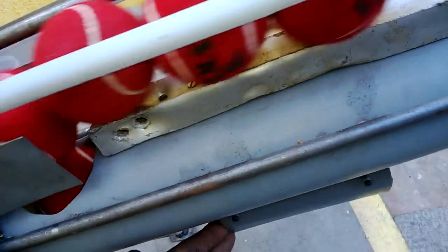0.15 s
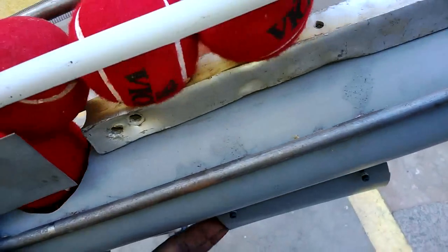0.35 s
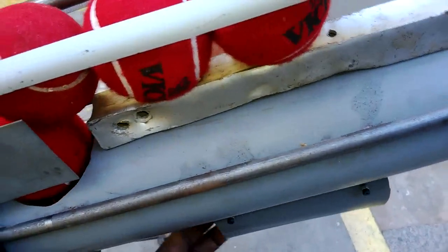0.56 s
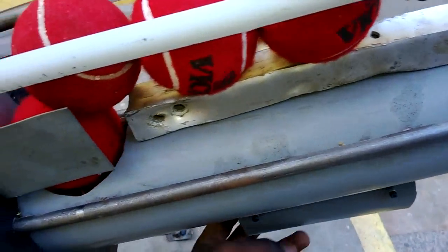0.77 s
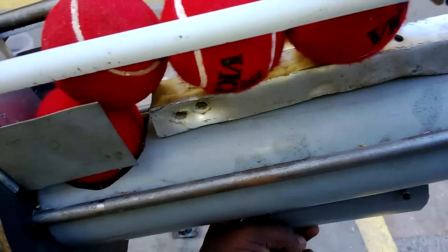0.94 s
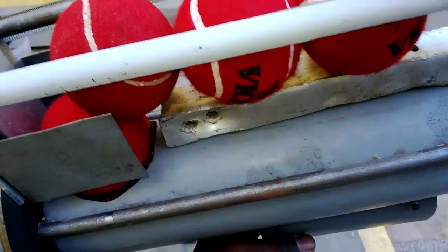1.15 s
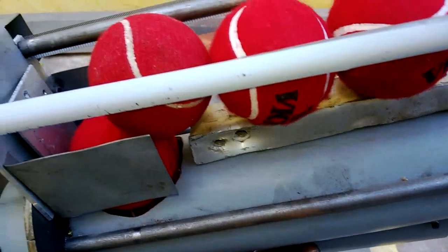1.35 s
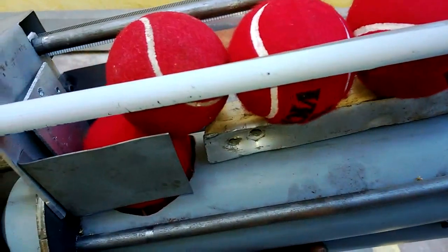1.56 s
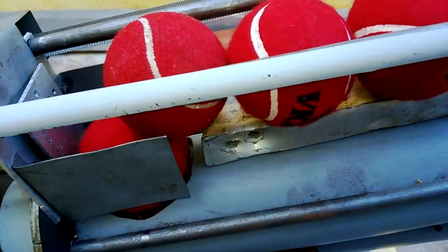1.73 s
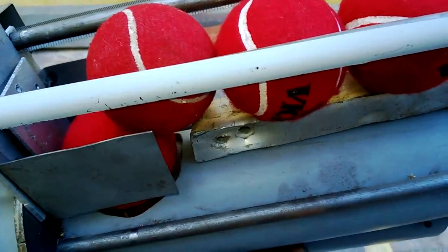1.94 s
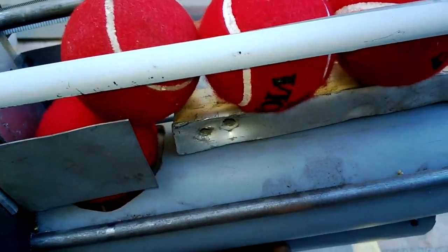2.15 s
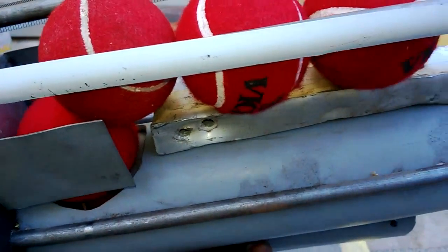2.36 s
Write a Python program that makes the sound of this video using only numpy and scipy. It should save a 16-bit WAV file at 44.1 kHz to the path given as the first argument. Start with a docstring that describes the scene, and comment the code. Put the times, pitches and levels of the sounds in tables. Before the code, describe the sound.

Outdoors, close to the microphone, a ball launcher's plunger slams into a pipe and loose steel parts clatter briefly. A ball then knocks softly on a tray, over faint rumble, far machinery and a thin high whine.

```python
"""Outdoors, close to a homemade ball launcher. The catch slips and the plunger slams into the pipe,
exciting its normal modes under a noisy crack. Loose steel parts scrape by friction and rattle by
repeated impact, the frame shudders, and a ball settles on a tray with faint knocks. Distant machinery
drones over a low rumble and a faint hiss; a thin electronic whine sits at the top."""
import sys
import numpy as np
from scipy import signal
from scipy.fft import rfft, irfft, next_fast_len
from scipy.io import wavfile
from scipy.ndimage import uniform_filter1d, map_coordinates

SR = 44100
rng = np.random.default_rng(int(sys.argv[2]) if len(sys.argv) > 2 else 0)


def generate_wav(sig):
    """Save sig (samples, or channels by samples) to the path in sys.argv[1] as 16-bit PCM at SR."""
    pcm = np.round(np.clip(np.atleast_2d(sig).T, -1, 1) * 32767).astype(np.int16)
    wavfile.write(sys.argv[1], SR, pcm)


N = 105840
T = np.arange(N) / SR


def amp(db):
    """Amplitude ratio of a level in decibels."""
    return 10 ** (np.asarray(db) / 20)


def unit(x):
    """Normalisation to an rms of 1."""
    return x / np.sqrt(np.mean(x ** 2) + 1e-20)


def envelope(times, db):
    """Gain interpolated in decibels, zero outside the given times."""
    return amp(np.interp(T, times, db)) * (T >= times[0]) * (T <= times[-1])


def wobble(rate):
    """Smooth random modulation with rate knots a second."""
    return map_coordinates(rng.standard_normal(int(N * rate / SR) + 4), [T * rate])


def filtered(x, response):
    """Linear filtering: the spectrum of x times a frequency response."""
    size = next_fast_len(len(x) + 8192)
    return irfft(rfft(x, size) * response(np.fft.rfftfreq(size, 1 / SR)), size)[:len(x)]


def shelf(x, treble_db, corner_hz=12000):
    """Shelving filter: what a two-pole low-pass rejects is scaled by treble_db."""
    low = filtered(x, lambda f: 1 / (1 + 1j * f / corner_hz) ** 2)
    return low + amp(treble_db) * (x - low)


def noise(spectrum, size=N, patchy_db=0):
    """Coloured noise of rms 1, modulated in random patches of time and frequency."""
    cells = signal.stft(rng.standard_normal(size + 512), nperseg=512)[2]
    patches = uniform_filter1d(rng.standard_normal(cells.shape), 4, axis=0)
    patches = unit(uniform_filter1d(patches, 12, axis=1))
    white = signal.istft(cells * amp(patchy_db * patches), nperseg=512)[1][:size]
    hz, db = np.transpose(spectrum)
    return unit(filtered(white, lambda f: amp(np.interp(np.log(f + 1), np.log(hz + 1), db, -120, -120))))


def decay(t, t60, hold_s=0):
    """Exponential damping: steady for hold_s, then down 60 dB every t60 seconds."""
    return amp(-60 * np.maximum(t - hold_s, 0) / t60)


def ring(modes, t, scatter_db, hold_s=0):
    """Modal superposition: damped sinusoids, each with a random spread in level."""
    return sum(amp(db + rng.normal(0, scatter_db)) * decay(t, t60, hold_s) * np.sin(2 * np.pi * hz * t)
               for hz, db, t60 in modes)


def add(x, start_s, piece):
    """Superposition of a piece on x from start_s."""
    x[round(start_s * SR):][:len(piece)] += piece


# Rumble spectrum: f/Hz, spectral level/dB
RUMBLE_SPECTRUM = [(12, -50), (20, -20), (37, -10.5), (55, -1), (68, -6.5), (78, -3), (92, 2), (108, -12),
                   (125, -11.5), (160, -42)]
# Rumble envelope: t/s, level/dB
RUMBLE_ENVELOPE = [(0.0, -60), (0.01, -47.5), (0.34, -33.5), (0.53, -43), (0.56, -36), (0.62, -44.5),
                   (0.75, -35), (0.79, -42), (1.65, -42), (1.71, -34.5), (1.86, -57.5), (1.88, -41),
                   (2.03, -36.5), (2.12, -49), (2.17, -43), (2.4, -43.5)]
def rumble():
    """Amplitude modulation of low-frequency noise gives a lumpy rumble."""
    return envelope(*np.transpose(RUMBLE_ENVELOPE)) * noise(RUMBLE_SPECTRUM)


# Drone spectrum: f/Hz, spectral level/dB
DRONE_SPECTRUM = [(71, -30.5), (120, -0.5), (206, -4), (242, -3.5), (259, -14.5), (334, -5.5), (387, -5.5),
                  (507, 0), (550, -8.5), (596, -1), (710, -13.5), (1050, -20), (1220, -11), (1570, -6),
                  (1700, -13.5), (2060, -10), (3000, -34), (3900, -62.5), (6600, -120)]
# Drone envelope: t/s, level/dB
DRONE_ENVELOPE = [(0, -44.5), (.8, -42), (1.1, -43.5), (1.21, -42), (1.36, -45.5), (1.52, -42.5),
                  (1.6, -43.5), (1.7, -41.5), (1.8, -42), (1.86, -45), (1.93, -43.5), (2.03, -42),
                  (2.18, -44.5), (2.4, -43)]
# Machine hums: f/Hz, mean level/dB
HUM_BANDS = [(522.2, -58.5), (586.8, -64), (1260, -58), (1534, -55.5), (2003, -56.5), (2169, -61)]
# Far hiss: f/Hz, spectral level/dB
HISS_SPECTRUM = [(1500, -39), (2600, -2.5), (3030, -5), (3550, 3), (4100, -6), (4600, -4), (8300, -20.5),
                 (10800, -23.5), (11500, -34), (12800, -19), (14600, -6), (15600, -13.5), (15900, -47.5)]
def machinery(hum_width_hz=9):
    """Resonance: a distant drone with wavering narrow-band hums; a far hiss swells along with it."""
    level_db = np.interp(T, *np.transpose(DRONE_ENVELOPE))
    swell_db = level_db - level_db.mean()
    drone = amp(level_db) * noise(DRONE_SPECTRUM, patchy_db=1.93)
    hums = np.zeros(N)
    for hz, db in HUM_BANDS:
        band = filtered(rng.standard_normal(N), lambda f: 1 / (1 + ((f - hz) / hum_width_hz) ** 2))
        hums += amp(db + swell_db) * unit(band)
    hiss = amp(-63.5 + 0.3 * swell_db) * noise(HISS_SPECTRUM, patchy_db=1.5)
    return drone + hums + hiss


def whine(hz=15000, db=-48):
    """An electronic pure tone with slight amplitude modulation."""
    return amp(db + 0.3 * wobble(25)) * np.sin(2 * np.pi * hz * T)


def reflections(x, db=-16, t60=0.13):
    """Convolution with a short, weak impulse response of the ground and nearby walls."""
    t = T[:SR // 4]
    tail = decay(t, t60) * noise([(100, 0), (3000, -6), (16000, -7.5)], size=len(t))
    delayed = np.pad(x, (150, 0))  # 3.4 ms
    return amp(db) * signal.fftconvolve(delayed, tail / np.linalg.norm(tail))[:N]


# Frame vibration: f/Hz, spectral level/dB
FRAME_SPECTRUM = [(90, -12.5), (200, 3), (350, -2.5), (650, -4.5), (1000, -13.5), (1600, -41.5)]
# Shudder envelope: t/s, level/dB
FRAME_ENVELOPE = [(.2, -57.5), (.225, -37), (.3, -31.5), (.38, -37.5), (.415, -48), (.5, -57)]
def frame_shudder():
    """Random vibration of the frame builds after the blow and dies away."""
    return envelope(*np.transpose(FRAME_ENVELOPE)) * noise(FRAME_SPECTRUM)


# Squeaks: centre t/s, duration/s, f/Hz, level/dB, phase wander/rad
SQUEAK_TONES = [(.025, .03, 9050, -45, 3.5), (.14, 0.041, 10620, -49, 1.2)]
def squeaks():
    """Friction tones of the moving parts, wavering in level and phase under Gaussian envelopes."""
    x = np.zeros(N)
    for centre, length, hz, db, wander in SQUEAK_TONES:
        gain = amp(db + 3.56 * wobble(120)) * np.exp(-2 * ((T - centre) / length) ** 2)
        x += gain * np.sin(2 * np.pi * hz * T + wander * wobble(300))
    return x


# Friction noise: f/Hz, spectral level/dB
SCRAPE_SPECTRUM = [(120, -44.5), (200, -14.5), (520, -7), (1010, -12), (1330, -7), (2110, -5.5),
                   (3940, -10.5), (10800, -15.5), (16200, -30)]
# Course of the slide: t/s, level/dB, treble gain/dB
SCRAPE_ENVELOPE = [(0, -40, 2), (.04, -40, 2.5), (.07, -42.5, -1.5), (.155, -42.5, 1.5), (.167, -34, -12),
                   (.197, -36.5, -4), (.203, -25, 5.5), (.24, -26, 2), (.275, -29.5, 2), (.3, -34.5, 4.5),
                   (.345, -29, 1), (.385, -31, -2), (.41, -47.5, 0.5), (.45, -47.5, -5), (.465, -63, -12)]
def scrape():
    """Sliding friction: broadband noise, made gritty by fast amplitude modulation."""
    times, db, treble_db = np.transpose(SCRAPE_ENVELOPE)
    grit = unit(noise(SCRAPE_SPECTRUM, patchy_db=2) * amp(1.5 * wobble(300)))
    return envelope(times, db) * shelf(grit, np.interp(T, times, treble_db))


# Tray modes: f/Hz, level/dB, T60/s
TRAY_MODES = [(212, -6.5, 0.13), (344, 1.5, 0.1), (653, 0.5, 0.031), (1200, 5.5, 0.035), (1400, -6, 0.027),
              (2890, -7, 0.021), (6340, 0.5, 0.016)]
# Contact noise of the ball: f/Hz, spectral level/dB
TAP_SPECTRUM = [(470, -37), (800, -21), (1390, -6), (3530, -6.5), (6550, -19.5), (11500, -34), (16200, -45)]
# Ball impacts: t/s, level/dB, rustle time constant/s, treble gain/dB
BALL_IMPACTS = [(0.572, -36.5, 0.00093, 6), (0.58, -18.5, 0.0032, -1.5), (0.591, -24.5, 0.0076, -5.5),
                (0.622, -38.5, 0.011, 3), (0.679, -35, 0.011, -14), (2.025, -46, 0.0046, -10.5)]
def ball_knocks():
    """Impact excitation: a settling ball gives the tray a dull ring and a brief rustle."""
    x, t = np.zeros(N), T[:SR // 8]
    attack = 1 - np.exp(-t / 0.00037)
    for start, db, tau, treble_db in BALL_IMPACTS:
        rustle = np.exp(-t / tau) * shelf(noise(TAP_SPECTRUM, size=len(t), patchy_db=2.5), treble_db)
        tray = ring(TRAY_MODES, t, scatter_db=2.5)
        add(x, start, amp(db) * attack * (0.2 * tray + 0.47 * rustle))
    return x


# Resonances of the loose steel: f/Hz, bandwidth/Hz, level/dB
STEEL_MODES = [(2506, 70, -5), (3540, 88, -5.5), (4824, 70, -1), (5554, 60, -2.5), (5890, 80, -4.5),
               (6896, 53, -4.5), (8260, 110, -2), (9520, 110, -3), (10400, 70.6, -2), (11185, 75, -9),
               (12250, 76, -9.5)]
def steel_response(f, focus_hz, focus_octaves=0.1):
    """Second-order resonators of alternating sign, weighted towards those near focus_hz."""
    response = 0
    for k, (hz, width, db) in enumerate(STEEL_MODES):
        weight = amp(db) * np.exp(-(np.log2(hz / focus_hz) / focus_octaves) ** 2 / 2)
        resonance = 1j * f * width / (hz ** 2 - f ** 2 + 1j * f * width)
        response += (-1) ** k * weight * resonance
    return response


# Contact noise of steel: f/Hz, spectral level/dB
JANGLE_SPECTRUM = [(470, -30), (800, -5.5), (1640, -19.5), (1880, -5), (3040, -5), (5700, 0.5),
                   (7150, -6.5), (10300, -4), (16200, -19.5)]
# Clinks: t/s, level/dB, focus f/Hz, chatter hold/s, treble gain/dB, ring gain/dB
STEEL_IMPACTS = [(0.163, -21, 6200, 0.0035, -26, -1), (0.184, -27.5, 3580, 0.0043, -24.5, 4),
                 (0.218, -17, 12700, 0.0022, -0.5, 3), (.260, -12, 6650, 0.0051, -14, -4),
                 (0.277, -16, 3450, .003, 6, -6.5), (.2845, -13.5, 8260, .006, -7.5, 2.5),
                 (0.3058, -8, 10900, 0.0079, 1, -4), (0.3293, -6, 10340, .005, 1, -2.5),
                 (.350, -16.5, 2500, .005, -2, -1.5), (0.3604, -5.5, 6800, 0.0055, 1, -8.5),
                 (.367, -12, 4785, .004, -2, -7.5), (0.3766, -10.5, 10180, 0.0033, -4.5, -3.5),
                 (0.383, -15.5, 5910, .002, -1, -3), (0.44, -32.5, 4100, 0.0019, -16, -5.5)]
def steel_rattle(contacts_per_s=400, t60=0.028):
    """Forced response: in each clink, random contacts drive the steel's resonances over broad noise."""
    x, t = np.zeros(N), T[:SR // 8]
    for start, db, focus_hz, hold_s, treble_db, ring_db in STEEL_IMPACTS:
        shape = (1 - np.exp(-t / 0.000504)) * decay(t, t60, hold_s)
        contacts = rng.random(len(t)) < contacts_per_s / SR
        chatter = contacts * rng.standard_normal(len(t)) * shape
        chatter[1] = 2.5  # the firm first contact
        ringing = shape * filtered(chatter, lambda f: steel_response(f, focus_hz))
        ringing /= np.abs(ringing).max()
        jangle = shape * shelf(noise(JANGLE_SPECTRUM, size=len(t), patchy_db=3.5), treble_db)
        add(x, start, amp(db) * (0.59 * amp(ring_db) * ringing + 0.25 * jangle))
    return x


# Pipe modes: f/Hz, level/dB, T60/s
PIPE_MODES = [(185.2, -14.5, 0.05), (346, -13.5, 0.054), (488, -7.5, 0.051), (670, -2.5, 0.028),
              (983, -16, 0.069), (1336, -6, .02), (1935, -11.5, 0.03), (2495, -12, .03),
              (2807, -7.5, 0.032), (3566, -18.5, .04), (4560, -9, 0.02), (5370, -14.5, .04),
              (6400, -12, 0.037), (8820, -10, 0.031)]
# Crack of the blow: f/Hz, spectral level/dB
CRACK_SPECTRUM = [(200, -29.5), (600, -8.5), (1100, -16.5), (2700, -6), (4500, -6.5), (6500, -9.5),
                  (9000, -9), (13000, -16.5), (16300, -28.5)]
def plunger_slam(start_s=0.1998, gain_db=-6):
    """Free vibration: the struck pipe rings under a noisy crack until the plunger damps it."""
    x, t = np.zeros(N), T[:SR // 4]
    attack = 1 - np.exp(-t / 0.00033)
    crack = amp(-4.5) * decay(t, t60=0.055, hold_s=0.0065) * noise(CRACK_SPECTRUM, size=len(t))
    pipe = ring(PIPE_MODES, t, scatter_db=1.5, hold_s=0.0081)
    add(x, start_s, amp(gain_db) * attack * (0.73 * pipe + crack))
    return x


def scene():
    """Superposition of the impacts, their reflections, the moving parts and the background."""
    impacts = plunger_slam() + steel_rattle() + ball_knocks()
    launcher = impacts + reflections(impacts) + scrape() + squeaks() + frame_shudder()
    background = rumble() + machinery() + whine()
    return (launcher + background)[None]


def record(dry):
    """Soft saturation rounds the loudest peaks; an ideal low-pass limits the band."""
    ceiling, hardness, cutoff_hz = 1.06, 3.8, 16370
    saturated = dry[0] / (1 + np.abs(dry[0] / ceiling) ** hardness) ** (1 / hardness)
    return filtered(saturated, lambda f: f < cutoff_hz)[None]


dry = scene()
out = record(dry)
generate_wav(out)
```